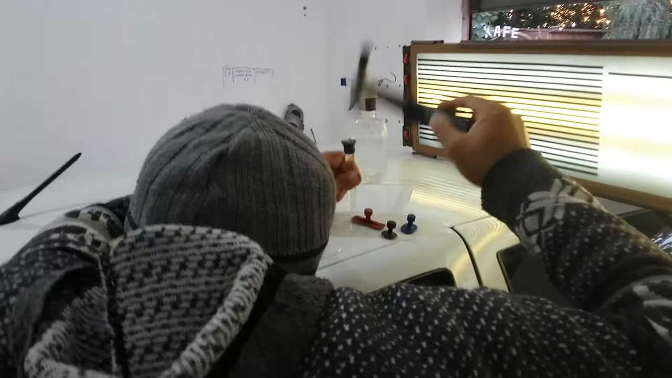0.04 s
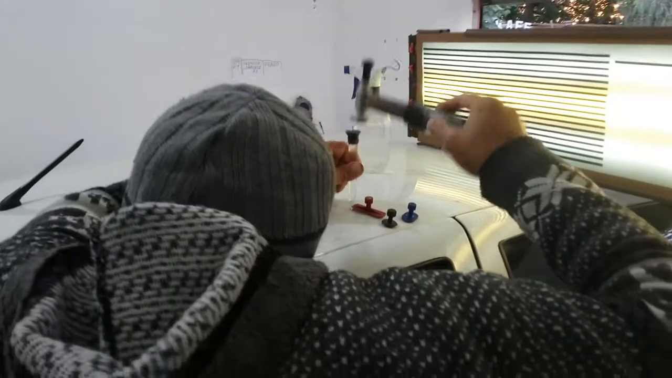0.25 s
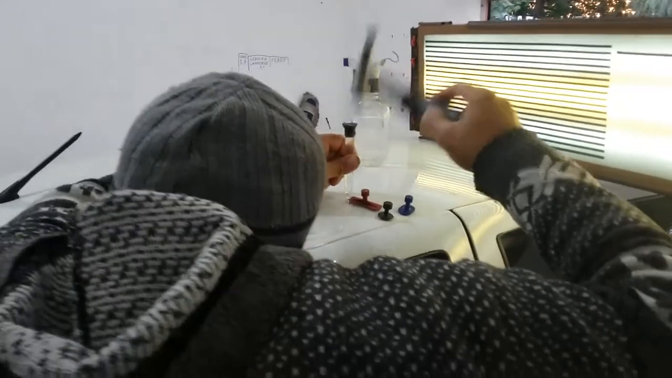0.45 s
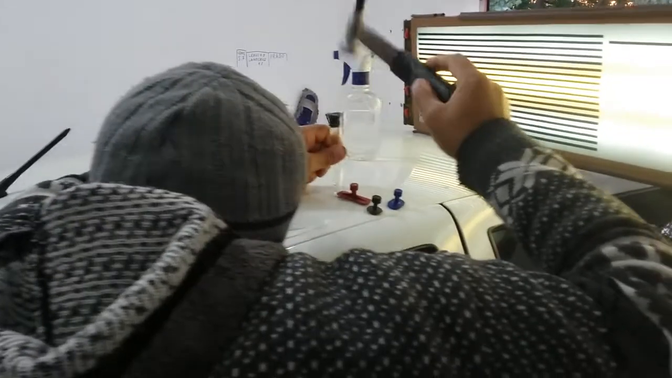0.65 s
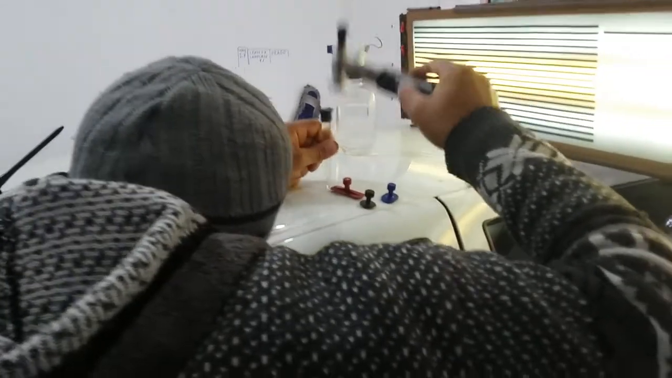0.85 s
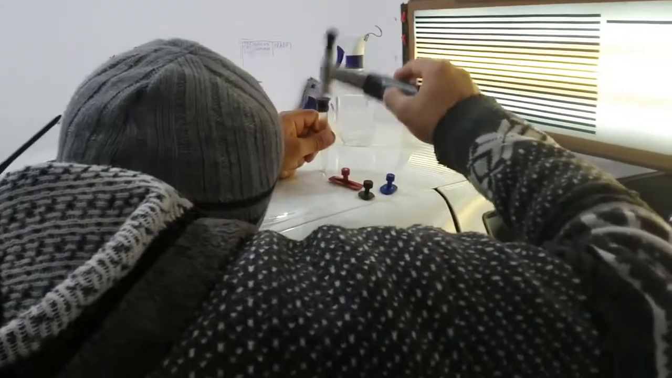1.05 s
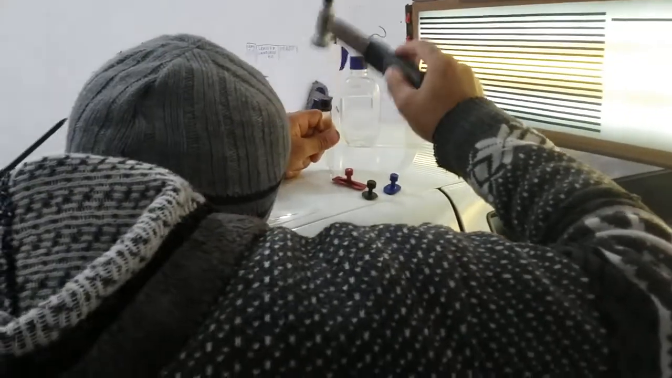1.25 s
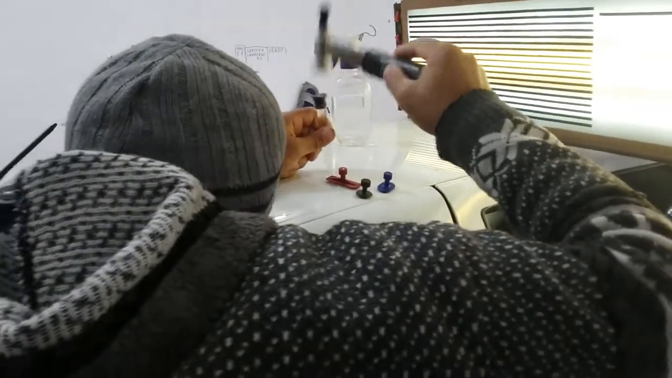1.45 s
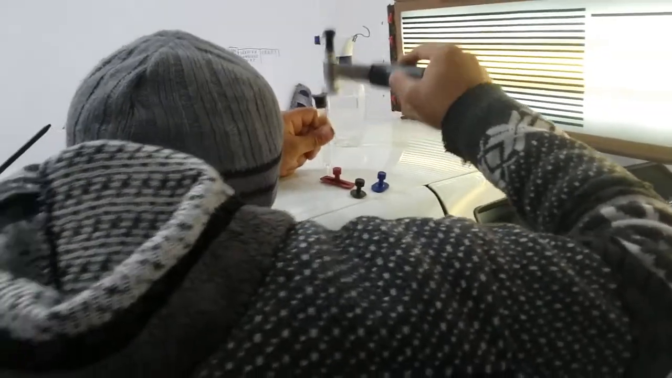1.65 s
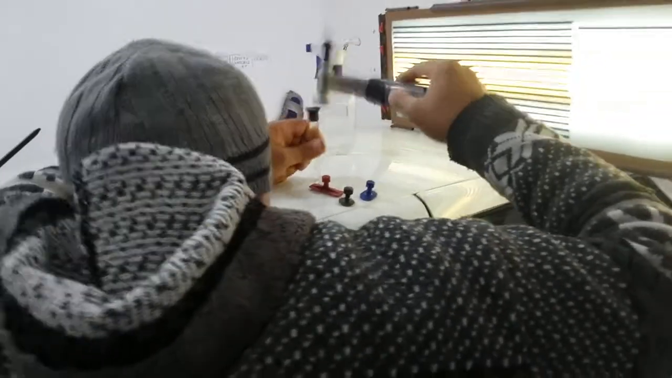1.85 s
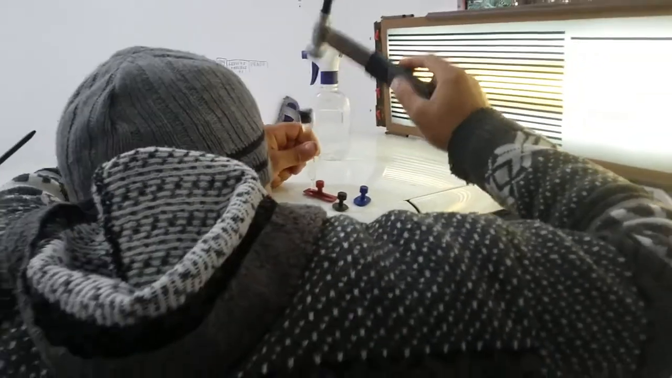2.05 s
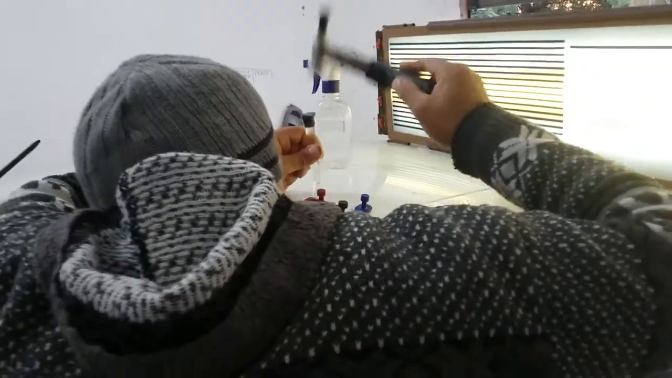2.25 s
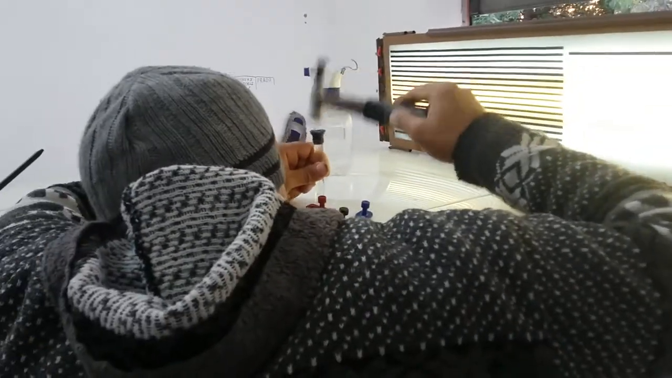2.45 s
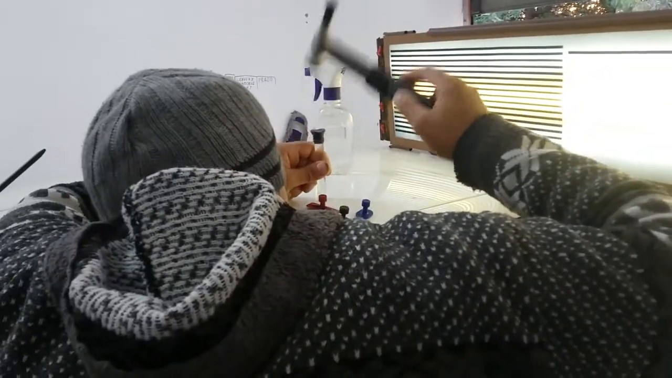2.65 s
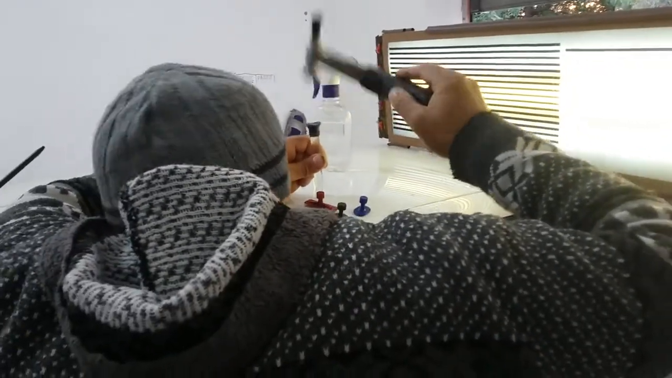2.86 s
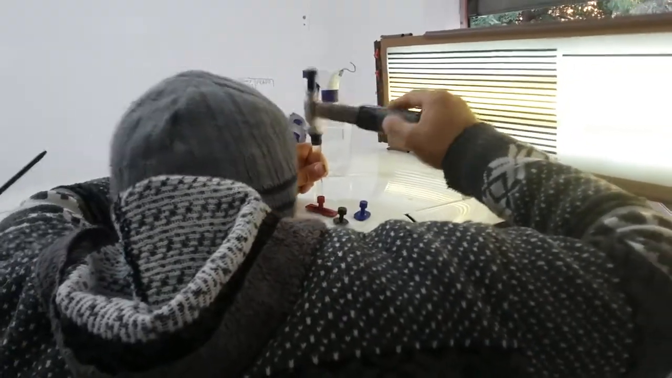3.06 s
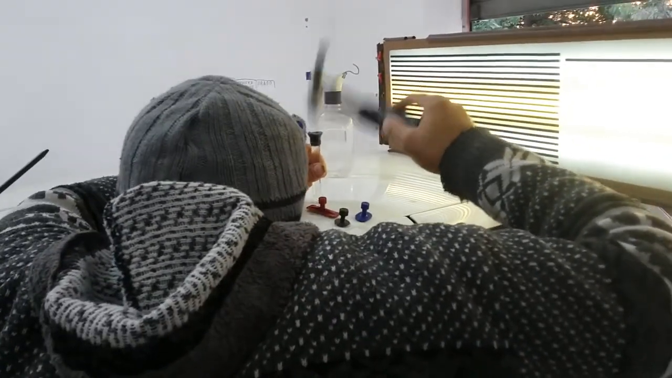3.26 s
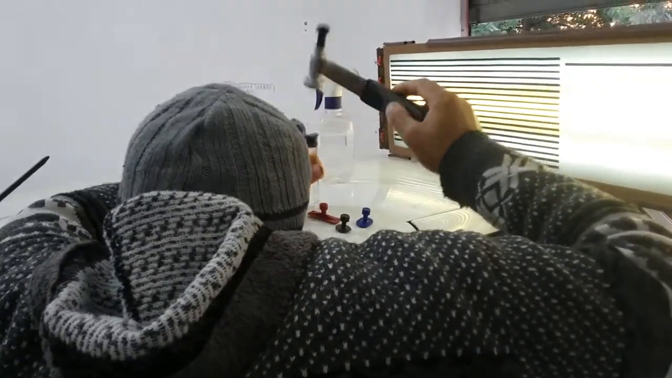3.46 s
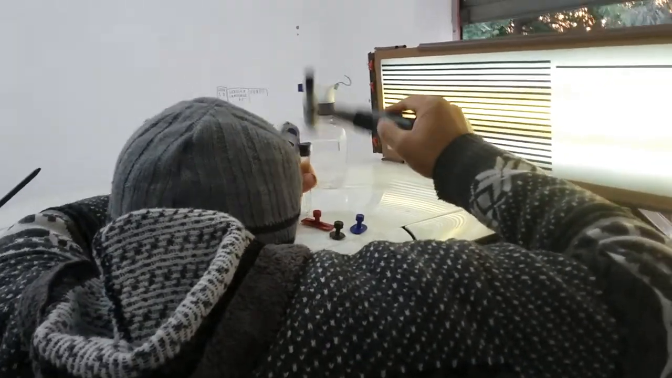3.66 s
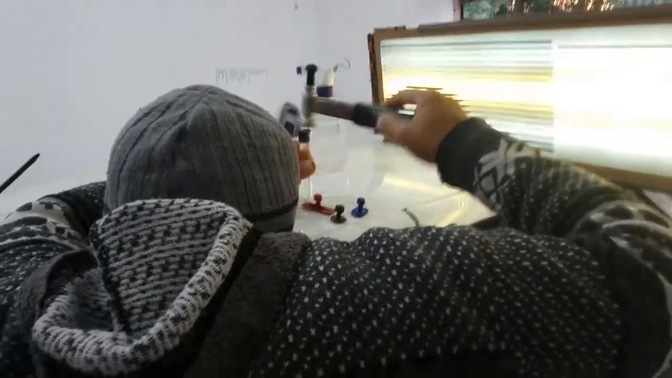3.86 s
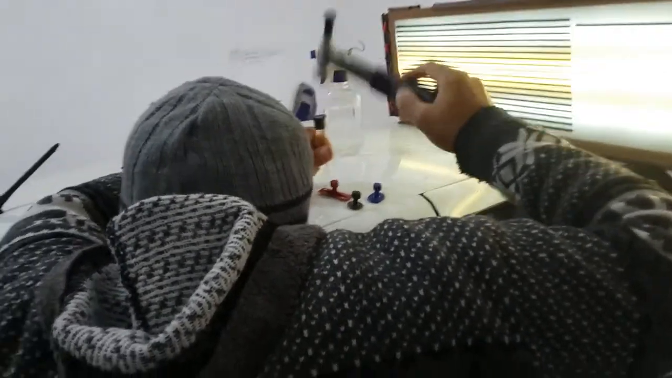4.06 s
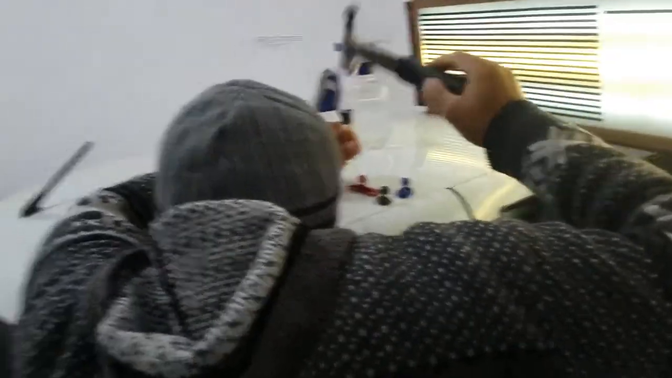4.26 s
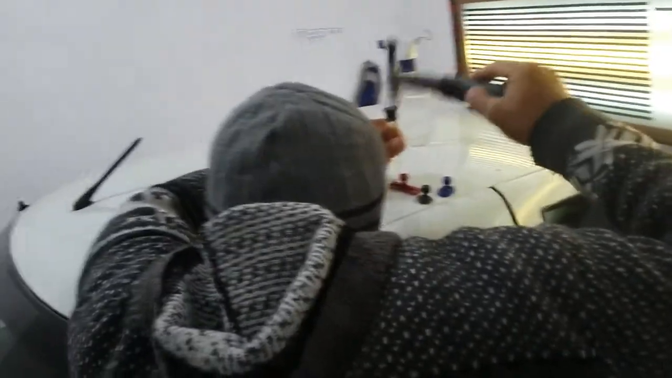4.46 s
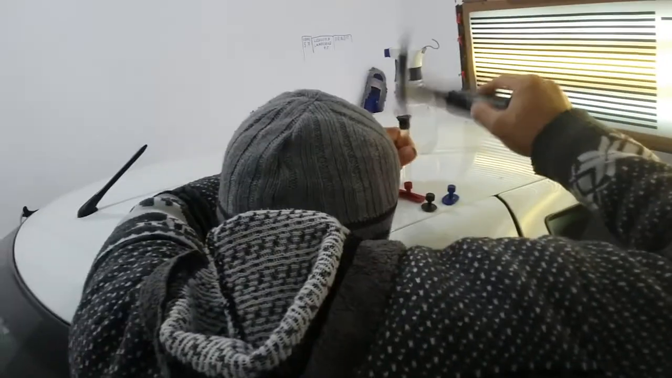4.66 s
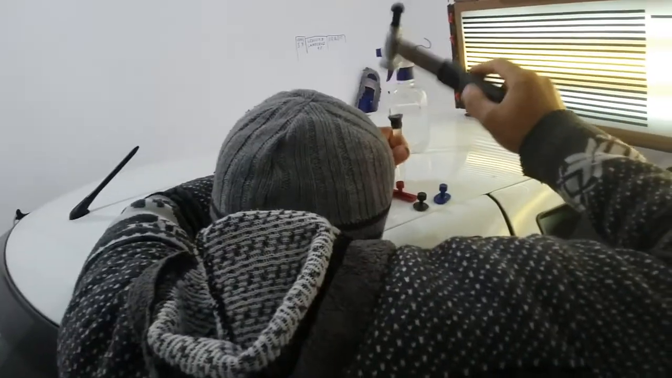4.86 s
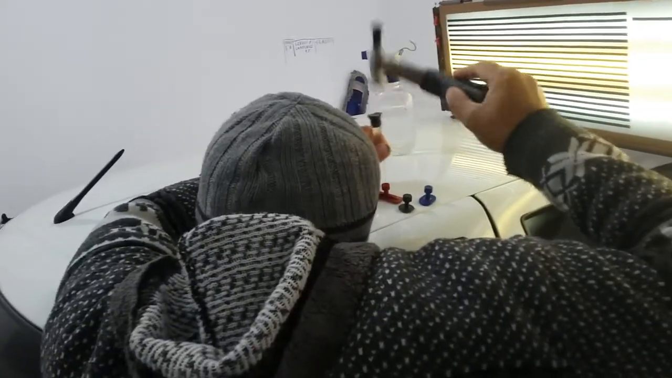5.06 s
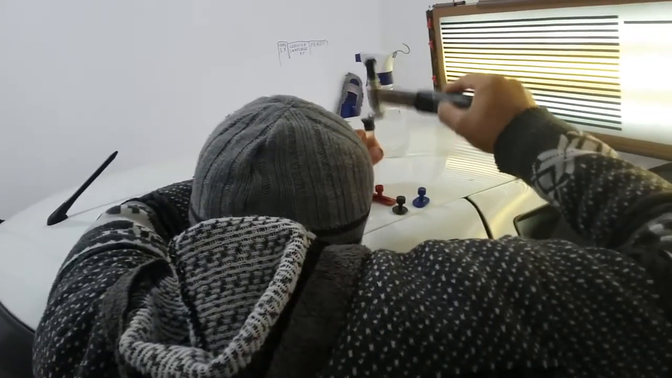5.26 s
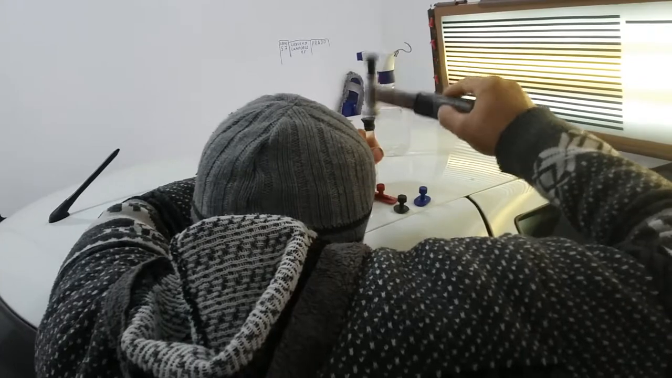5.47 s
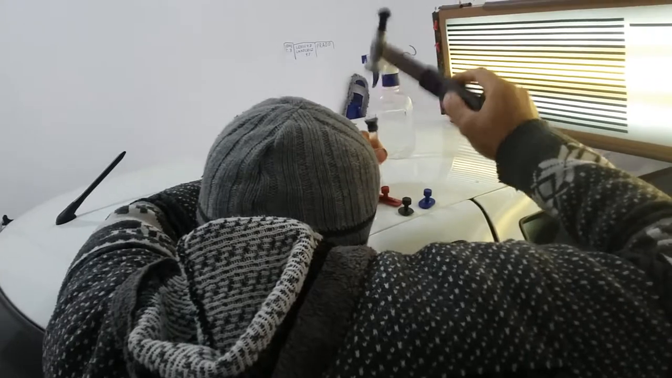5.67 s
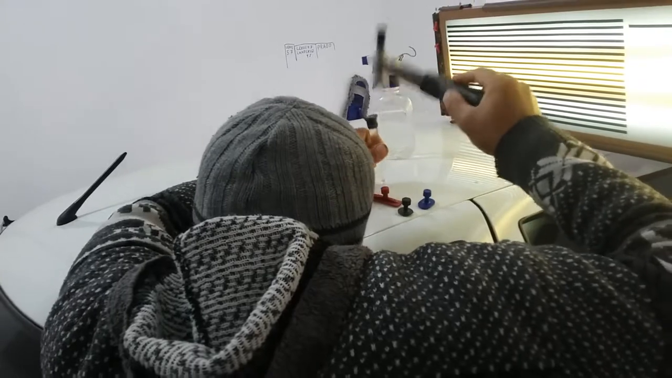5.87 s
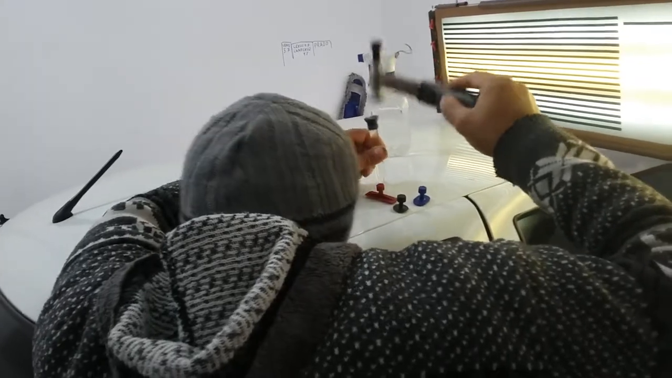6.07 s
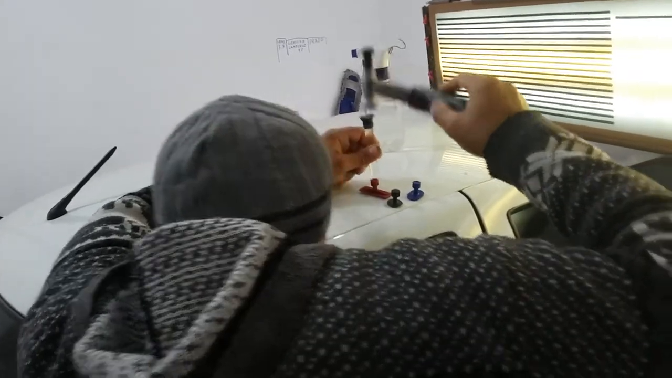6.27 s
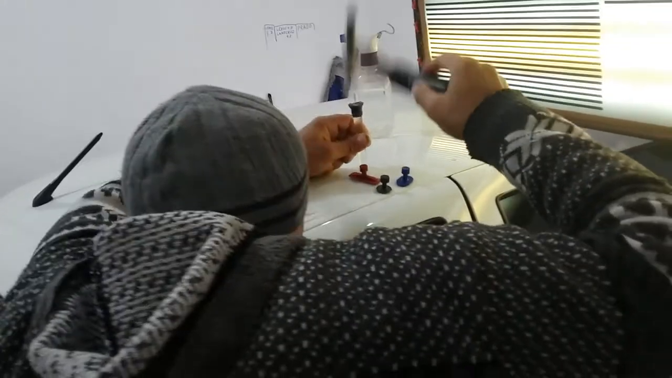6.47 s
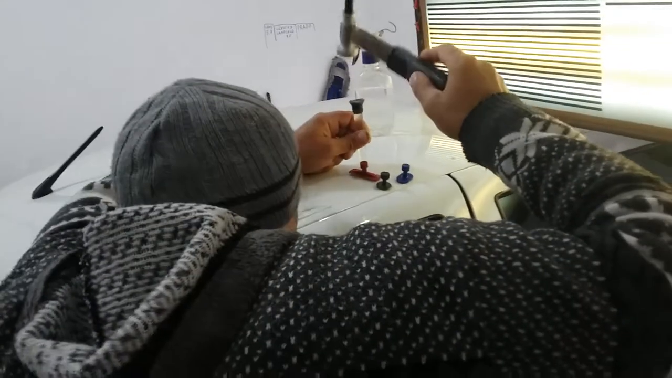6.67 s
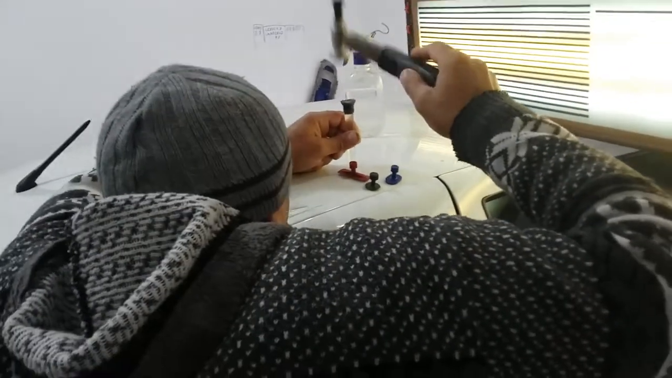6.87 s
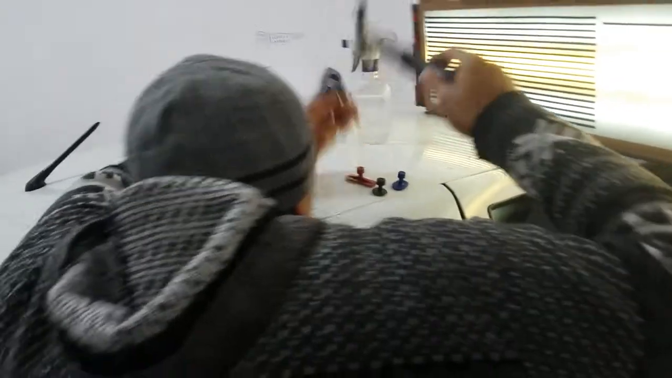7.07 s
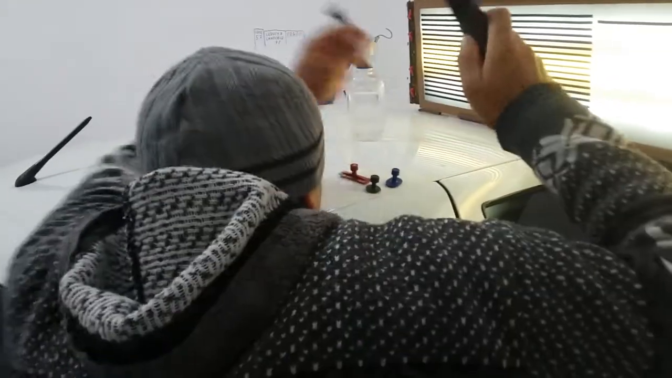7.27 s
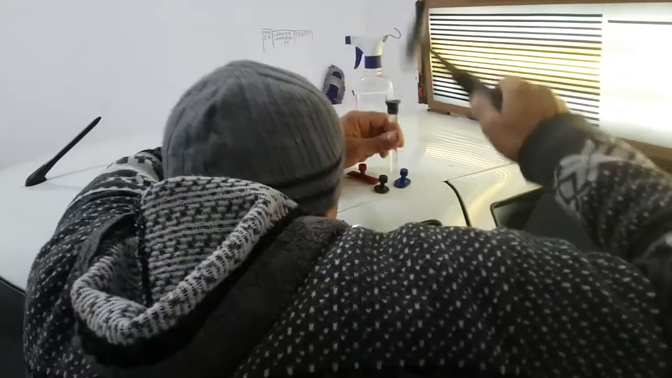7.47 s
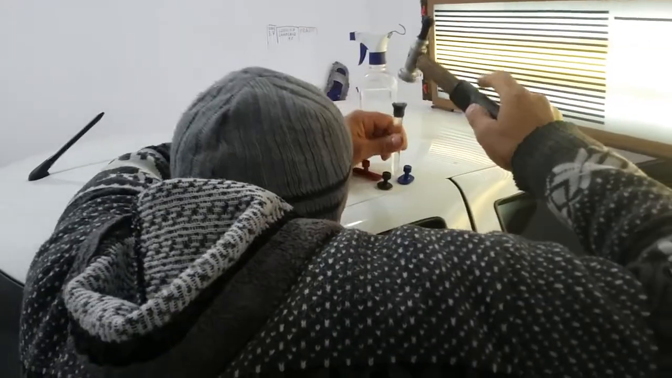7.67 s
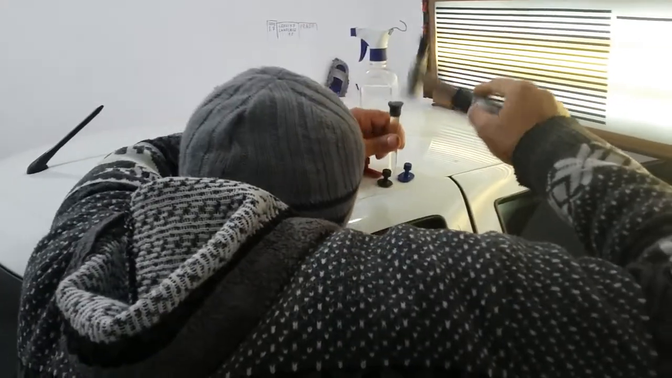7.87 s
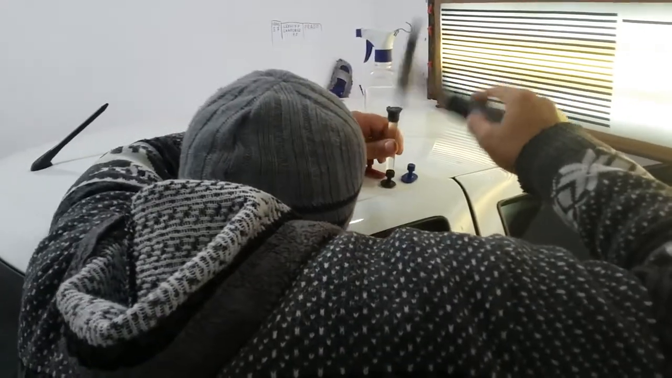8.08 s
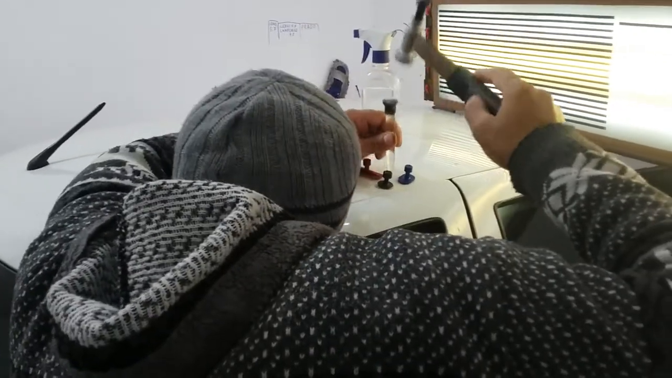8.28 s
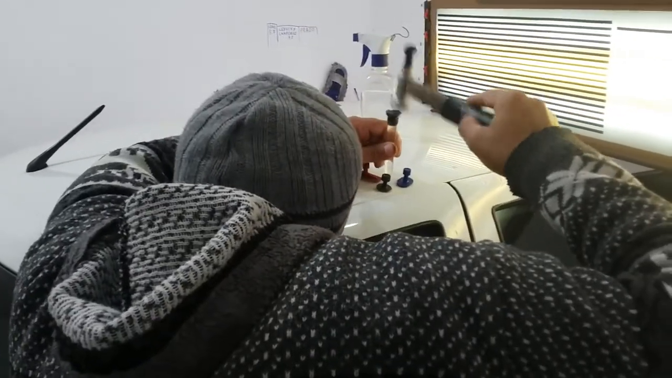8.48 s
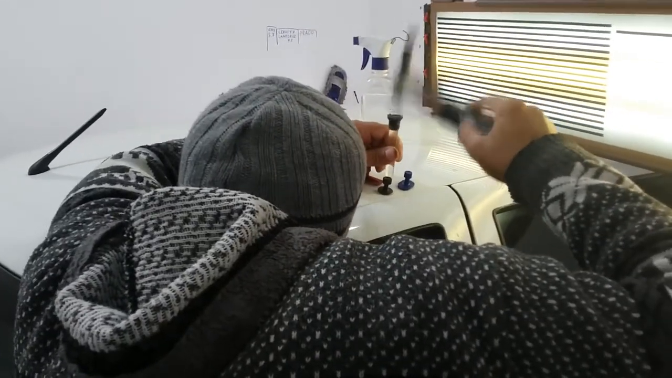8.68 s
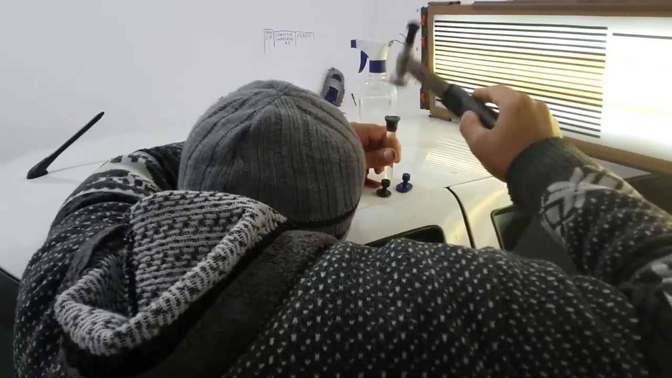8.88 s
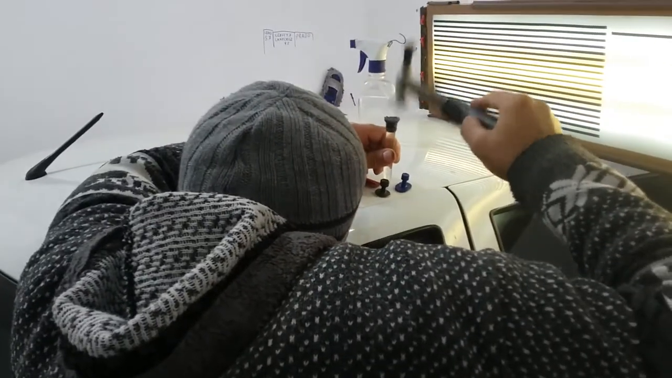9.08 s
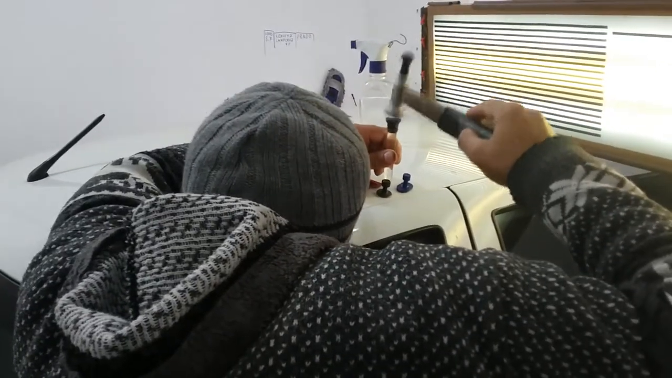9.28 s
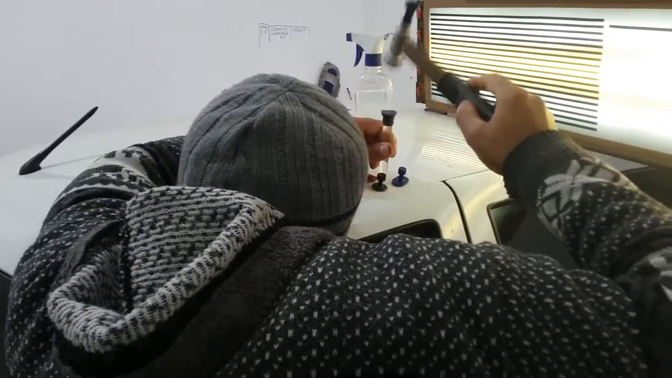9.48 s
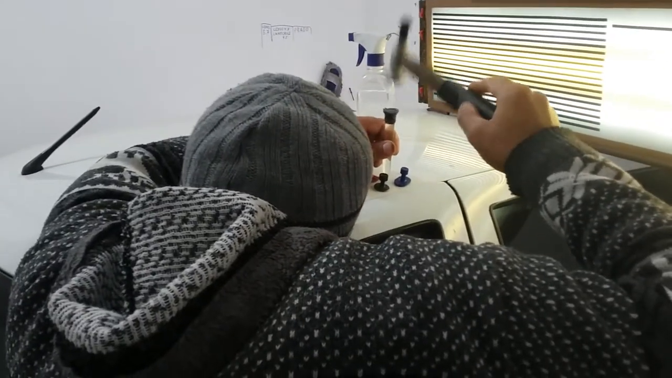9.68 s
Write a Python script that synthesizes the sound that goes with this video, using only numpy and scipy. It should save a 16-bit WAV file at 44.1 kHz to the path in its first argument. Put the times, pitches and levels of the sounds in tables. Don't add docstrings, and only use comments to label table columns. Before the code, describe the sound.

Close, even metal tapping: hammer on punch on a thin car roof panel, dry click first, then a drum-like ring and roughly half a second of room reverberation. The long first run gives way to four taps with a changed pitch, a gap of about a second with soft ticks as the tip is set down, and six more taps. Faint workshop hiss and distant wavering hum continue throughout, the level dipping slightly around blows.

```python
import sys
import numpy as np
from scipy import signal
from scipy.io import wavfile
from scipy.ndimage import uniform_filter1d, minimum_filter1d

SR = 44100
rng = np.random.default_rng(int(sys.argv[2]) if len(sys.argv) > 2 else 0)


def store_pcm(level_fs):
    pcm = np.round(np.clip(level_fs, -1, 1) * 32767).astype(np.int16)
    wavfile.write(sys.argv[1], SR, np.atleast_2d(pcm).T)


def natural_amplitude(level_db):
    exponent = np.asarray(level_db, float) / 20
    return 10 ** exponent


N = 429534

# (frequency [Hz], level per Hz [dB])
HISS = [(47, -35), (80, -20.5), (107, -13.5), (142, -5), (271, -9.5), (493, -13), (1070, -16),
        (1340, -14.5), (1900, -16.5), (4140, -45), (16000, -65)]
HISS_DB = -34.5
# (time [s], top level [dB], pitch [Hz])
HUM_SWELLS = [(0.0, -48, 52), (0.45, -52, 52), (0.9, -52, 50), (1.44, -65, 52), (2.1, -63, 52),
              (2.649, -40, 68), (3.3, -42, 67.5), (3.78, -43, 66.7), (4.15, -45, 66), (4.8, -46, 49),
              (5.6, -49, 52), (6.05, -39, 53), (6.5, -47, 54.2), (7.35, -37.5, 56.1), (7.87, -35.5, 57),
              (8.3, -36.5, 58), (8.7, -36.5, 56.4), (9.15, -32, 58), (9.74, -36, 55)]
HUM_WANDER_HZ, SWELL_DB_PER_S, FADE_DB_PER_S = 1.5, 29, 30
GROWL_DB = -2

# (frequency [Hz], level [dB])
ECHO_COLOUR = [(60, -16.5), (110, -15.5), (200, -13), (400, -8.5), (800, -4.5), (1300, -13), (1900, -12),
               (2600, -16), (3400, -48.5), (4300, -10), (5600, -23.5), (7000, -7), (9000, -17.5),
               (15500, -14)]
# (frequency [Hz], time [s])
ECHO_T60 = [(80, 0.48), (210, 0.92), (560, 0.57), (1470, 0.59), (3880, 0.58), (10200, 0.44)]
ECHO_RISE_S, ECHO_RISE_CYCLES = 0.0017, 3.0
FRESH_SHARE = 0.25

# (frequency [Hz], level [dB], time to fall 60 dB [s])
FIRST_MODES = [(130.4, -3.5, 0.61), (152.6, -3, 0.57), (174.6, 3, 0.57), (197.9, -1.5, 0.66),
               (213.9, 2.5, .5), (262.2, -7, 0.82), (327.7, -7.5, 0.43), (357, -6, 0.36), (405.7, -7, 0.47),
               (463, -9, 0.55), (531, -15, 0.84), (658, -14.5, 0.76), (828, -19, 0.48), (1811, -17, 0.41)]
SECOND_MODES = [(174.3, -8, 0.88), (190.4, -3, 0.69), (217.3, 3, 0.59), (260, -2.5, 0.86),
                (273, -2.5, 0.62), (324, 3.5, 0.49), (361, -2.5, 0.63), (378, -8, 0.44), (463, -24, 0.67),
                (506, -16, 0.78), (539, -9.5, 0.81), (591, -9, 0.71), (642, -4, 0.43), (1759, -19, 0.65)]
THIRD_MODES = [(184, -3, .55), (258, -6, .55), (286, 2, .55), (326, -4, .48), (357, -7, .5),
               (408, -10, .42), (436, -16, .4), (458, -11, .45), (662, -18, .5), (750, -16, .5),
               (786, -16, .45), (822, -14, .4), (860, -16, .5), (995, -19, .5)]
PANEL_DB, PANEL_TILT_DB = -2.5, 3.5
PANEL_RISE_S, PANEL_RISE_CYCLES = 0.0008, 3.2
PANEL_CUT_HZ = 88
NEIGHBOUR_HZ, NEIGHBOUR_SHARE = 9, 0.015
CROWDED_HZ = 250
PANEL_SCATTER_DB, PANEL_SCATTER_RAD = 2.5, 0.4

# (frequency [Hz], level [dB], length [s])
PUSH_AND_KNOCK = [(270, 8, .006), (750, 2, .004), (1350, -1, .0034), (1900, 3.5, .0036), (2400, -2, .003)]
# (frequency [Hz], level [dB])
CRACK = [(2700, -3.5), (3500, -9.5), (4300, -3), (5600, -16.5), (6800, 4.5), (7800, 5.5), (9000, -3),
         (12000, 5.5), (16000, -19)]
CRACK_S = 0.0036

# (time [s], force as thud [dB], knock at 1.3-3 kHz [dB], crack [dB])
FIRST_BLOWS = [(0.0014, -9.5, -8, -18), (0.3067, -10.5, -7, -16.5), (0.5616, -10, -5, -15),
               (0.848, -10.5, -4, -13.5), (1.1293, -12, -9, -16.5), (1.4053, -11.5, -7.5, -17),
               (1.6636, -13.5, -12, -23), (1.9391, -13, -15, -31.5), (2.2243, -13.5, -7, -18.5),
               (2.5295, -10, -13.5, -25.5), (2.8066, -10, -3, -14.5), (3.0936, -13, -0.5, -16),
               (3.3654, -13, -4.5, -16.5), (3.6461, -9, -5.5, -13.5), (3.92, -12, -5, -14.5),
               (4.1899, -10, -6.5, -14.5), (4.4626, -10, -5.5, -13.5), (4.7572, -10, -7.5, -17),
               (5.014, -10.5, -6, -15.5), (5.2766, -9.5, -5.5, -15.5), (5.5437, -9, -4.5, -17),
               (5.8195, -8.5, -6.5, -15.5), (6.0902, -11, -8, -15.5)]
SECOND_BLOWS = [(6.3225, -10, -9.5, -17.5), (6.5825, -10, -11.5, -23.5), (6.8265, -11.5, -12, -21.5),
                (7.0715, -9.5, -12.5, -27)]
THIRD_BLOWS = [(8.1769, -11, -4.5, -18), (8.4814, -11, -2, -15), (8.775, -8, -5, -19.5),
               (9.06, -9.5, -6, -26), (9.3505, -9.5, -5.5, -22), (9.624, -8, -4.5, -16.5)]
# (time [s], low-mid [dB], knock [dB], crack [dB])
TOUCHES = [(1.365, -56, -51, -55), (2.7567, -47, -40, -55), (5.3161, -24, -14, -26),
           (5.7674, -52, -41, -50), (6.4986, -37, -33, -43), (7.445, -40, -44, -68),
           (7.6888, -30, -25.5, -48), (7.8681, -26.5, -20.5, -39.5), (8.098, -39, -37, -48),
           (9.0977, -16, -18, -24.5), (9.393, -17, -29, -28.5)]
TOUCH_THUD_DB, TOUCH_SHEEN_DB = -8.5, -20
MOVES_S = [6.2, 7.3]
BAND_HZ = [260, 800, 2000, 6000, 12000]
# (low-mid against force [dB], sheen against crack [dB])
SPOT_COLOUR = [(-6, -15.5), (-6.5, -17.5), (-2.5, -22)]
SQUARE_CRACK_DB = -17
LOW_MID_FOLLOWS, SHEEN_FOLLOWS = 0.21, 0.91
# (frequency [Hz], level [dB])
LANDING = [
    [(2350, 3), (3350, -1.5), (4200, 1.5), (5650, -1.5)],
    [(1300, -1), (2350, 4.5), (3400, -2), (10300, 2)],
    [(1350, -0.5), (2350, -4.5), (3300, 0.5), (4200, -2)],
]
LANDING_WIDTH_HZ, LANDING_SCATTER, LANDING_SCATTER_DB = 600, 0.06, 2.5
# (time [s], frequency [Hz], level [dB])
OFF_CENTRE = [(0.31, 9300, -5), (0.85, 6760, 5.5), (1.13, 800, 2), (1.66, 1930, -4), (1.94, 9550, -12),
              (2.53, 5710, -2), (2.53, 13300, -8), (2.81, 3040, -4.5), (3.09, 1540, 2), (3.09, 2300, -13),
              (3.09, 3940, -3), (3.37, 2880, -8), (3.37, 3670, 5.5), (3.37, 7140, -3), (3.37, 5800, 4.5),
              (4.46, 3600, -3), (5.01, 3650, -7), (3.92, 10500, -7), (4.19, 6370, -4), (4.76, 3150, 0.5),
              (5.54, 9100, -7), (6.83, 8940, -11), (7.07, 7460, 6), (7.07, 1200, -5), (8.48, 3830, 1),
              (8.48, 1000, -5.5), (8.78, 2500, 2.5), (6.09, 11000, 8)]

LOW_CUT_HZ, TOP_CUT_HZ, HEADROOM = 50, 15850, 1.5
CEILING_DB, SQUEEZE, LIMITER_S = -14, 0.3, 0.02

EDGES = 45 * 2 ** np.arange(0, 8.7, 1 / 3)
CENTRES = np.sqrt(EDGES[1:] * EDGES[:-1])
TAIL = np.arange(SR) / SR


def rms_one(x):
    return x / np.sqrt(np.mean(x ** 2, axis=-1, keepdims=True) + 1e-20)


def at_hz(points, hz):
    table_hz, level_db = np.array(points).T
    return np.interp(np.log(hz), np.log(table_hz), level_db)


def noise_bands(size):
    white = rng.standard_normal((2, size + 4000))
    bands = []
    for k, pair in enumerate(zip(EDGES, EDGES[1:])):
        sos = signal.butter(2, pair, "band", fs=SR, output="sos")
        bands.append(signal.sosfilt(sos, white[k % 2])[4000:])
    return rms_one(np.array(bands))


def workshop():
    bands = noise_bands(size=N)
    hiss = (natural_amplitude(at_hz(HISS, CENTRES)) * np.sqrt(CENTRES) * (CENTRES > 75)) @ bands
    growl_bands = (CENTRES > 65) & (CENTRES < 140)
    growl = natural_amplitude(GROWL_DB) * rms_one(growl_bands @ bands[:, ::-1])

    sample, knots = np.arange(N), np.arange(N // 4000 + 2)
    wander = np.interp(sample / 4000, knots, rng.standard_normal(len(knots)))
    s, top_db, hz = np.transpose(HUM_SWELLS)[:, :, None]
    pitch = np.interp(sample / SR, s[:, 0], hz[:, 0]) + HUM_WANDER_HZ * wander
    hum = np.sqrt(2) * np.sin(2 * np.pi * np.cumsum(pitch) / SR)

    since = np.arange(0, N, 100) / SR - s
    fall_db = np.maximum(-SWELL_DB_PER_S * since, FADE_DB_PER_S * since)
    level_db = np.max(top_db - fall_db, axis=0)
    swell = natural_amplitude(np.interp(sample / 100, np.arange(len(level_db)), level_db))
    return natural_amplitude(HISS_DB) * rms_one(hiss) + swell * (hum + growl)


def room_shape():
    hz = CENTRES[:, None]
    fall = natural_amplitude(at_hz(ECHO_COLOUR, hz) - 60 * TAIL / at_hz(ECHO_T60, hz))
    return fall * (1 - np.exp(-TAIL / (ECHO_RISE_S + ECHO_RISE_CYCLES / hz)))


def panel(modes):
    hz, level_db, t60 = np.transpose(modes)[:, :, None]
    rise = PANEL_RISE_S + PANEL_RISE_CYCLES / hz
    decay = natural_amplitude(-60 * TAIL / np.clip(t60, .3, .9)) * (1 - np.exp(-TAIL / rise))
    offsets = rng.uniform(.6, 1.6, (3, len(hz), 1)) * np.reshape([0, 1, -1], (3, 1, 1))
    phases = rng.uniform(0, 4.5, offsets.shape)
    pitches = hz + offsets * (NEIGHBOUR_HZ + NEIGHBOUR_SHARE * hz)
    side = .65 * hz / (hz + CROWDED_HZ)
    shares = np.array([np.sqrt(1 - 2 * side ** 2), side, side])
    cluster = np.sum(shares * np.exp(1j * (2 * np.pi * pitches * TAIL + phases)), axis=0)
    gain = natural_amplitude(level_db + PANEL_DB + PANEL_TILT_DB * np.log2(hz / 256))
    return hz[:, 0], gain * decay * cluster


def peaking(x, hz, gain_db):
    w = 2 * np.pi * hz / SR
    alpha, a = np.pi * LANDING_WIDTH_HZ / SR, natural_amplitude(gain_db / 2)
    top = [1 + alpha * a, -2 * np.cos(w), 1 - alpha * a]
    bottom = [1 + alpha / a, -2 * np.cos(w), 1 - alpha / a]
    return signal.lfilter(top, bottom, x)


def burst(hz, length, turn):
    t = TAIL[:600]
    swell = np.sin(np.pi * np.clip(t / length, 0, 1) ** 1.05) ** 2
    return swell * np.cos(2 * np.pi * hz * t + turn)


def strength(row, hz):
    s, knock, thud, low_mid, crack, sheen = row
    return natural_amplitude(np.interp(np.log(hz), np.log(BAND_HZ), [thud, low_mid, knock, crack, sheen]))


def contact(row, chance):
    hz, level_db, length = np.transpose(PUSH_AND_KNOCK)[:, :, None]
    turn = np.pi + 2.5 * chance[:len(hz), None] * (hz > 1000)
    knock = natural_amplitude(level_db) * burst(hz, length, turn)
    dense = np.linspace(2700, 16400, len(chance))
    crack = burst(dense[:, None], CRACK_S, 2 * np.pi * chance[:, None])
    crack_gain = strength(row, dense) * natural_amplitude(at_hz(CRACK, dense))
    return strength(row, hz[:, 0]) @ knock + crack_gain @ crack


def band_levels():
    rows = []
    for blows, (low_mid_db, sheen_db) in zip([FIRST_BLOWS, SECOND_BLOWS, THIRD_BLOWS], SPOT_COLOUR):
        for s, force, knock, crack in blows:
            lost = crack - SQUARE_CRACK_DB
            low_mid = force + low_mid_db + LOW_MID_FOLLOWS * lost
            sheen = SQUARE_CRACK_DB + sheen_db + SHEEN_FOLLOWS * lost
            rows.append((s, knock, force, low_mid, crack, sheen))
    for s, low_mid, knock, crack in TOUCHES:
        rows.append((s, knock, low_mid + TOUCH_THUD_DB, low_mid, crack, crack + TOUCH_SHEEN_DB))
    return rows


def tapping():
    rows, out = band_levels(), np.zeros(N + SR)
    shape, fresh = room_shape(), noise_bands(size=2 * SR)
    spots = []
    for modes in (FIRST_MODES, SECOND_MODES, THIRD_MODES):
        spots.append((panel(modes), shape * noise_bands(size=SR)))
    for row in rows:
        spot = np.searchsorted(MOVES_S, row[0])
        (mode_hz, modes), echoes = spots[spot]
        skip = rng.integers(0, SR)
        echoes = echoes + FRESH_SHARE * shape * fresh[:, skip:skip + SR]

        by_db, by_rad = rng.standard_normal((2, len(modes)))
        scatter = natural_amplitude(PANEL_SCATTER_DB * by_db) * np.exp(1j * PANEL_SCATTER_RAD * by_rad)
        ring = ((strength(row, mode_hz) * scatter) @ modes).imag
        sound = ring + strength(row, CENTRES) @ echoes
        sound[:600] += contact(row, rng.random(40))

        for hz, gain_db in LANDING[spot]:
            off_hz, off_db = rng.standard_normal(2)
            sound = peaking(sound, hz * (1 + LANDING_SCATTER * off_hz), gain_db + LANDING_SCATTER_DB * off_db)
        for s, hz, gain_db in OFF_CENTRE:
            if abs(s - row[0]) < .02:
                sound = peaking(sound, hz, gain_db)
        start = max(round((row[0] - .0004) * SR), 0)
        out[start:start + SR] += sound
    return signal.sosfilt(signal.butter(2, PANEL_CUT_HZ, "high", fs=SR, output="sos"), out[:N])


def scene():
    return (workshop() + tapping())[None]


def band_limit(x):
    return signal.sosfilt(signal.butter(12, 16880, fs=SR, output="sos"), x)


def record(dry):
    thin = signal.sosfilt(signal.butter(3, LOW_CUT_HZ, "high", fs=SR, output="sos"), dry)
    dull = signal.sosfilt(signal.cheby2(14, 50, TOP_CUT_HZ + 250, fs=SR, output="sos"), thin)
    span = round(LIMITER_S * SR)
    room_left_db = CEILING_DB - 20 * np.log10(np.abs(dull) + 1e-9)
    tightest_db = np.minimum(minimum_filter1d(room_left_db, span), 0)
    limited = dull * natural_amplitude(uniform_filter1d(SQUEEZE * tightest_db, span))
    mix = HEADROOM * np.tanh(limited / HEADROOM)
    return band_limit(mix)


dry = scene()
out = record(dry)
store_pcm(out)
```